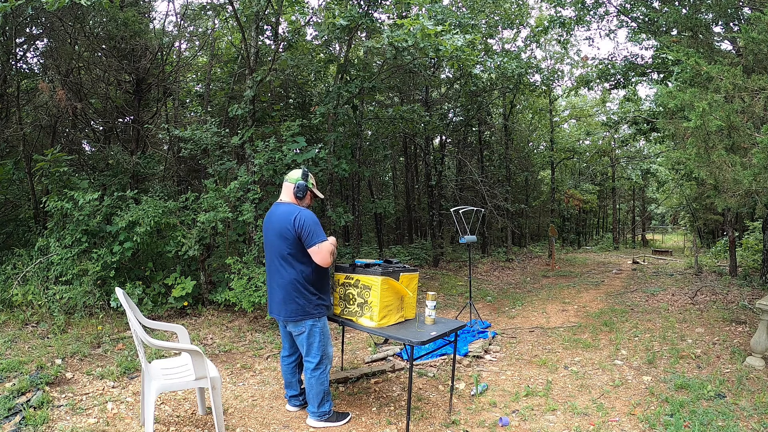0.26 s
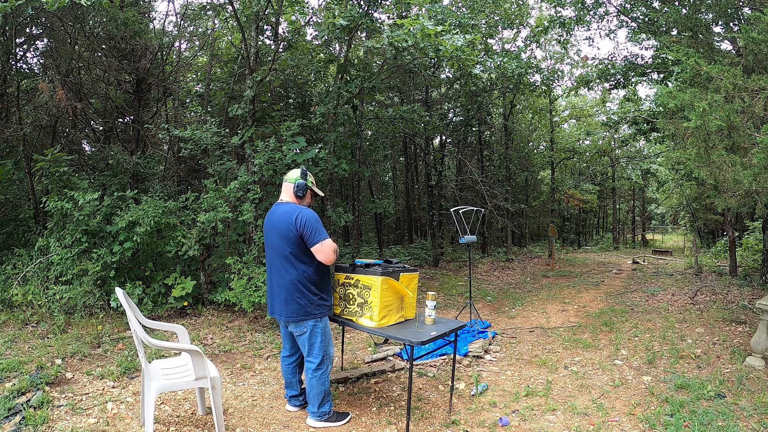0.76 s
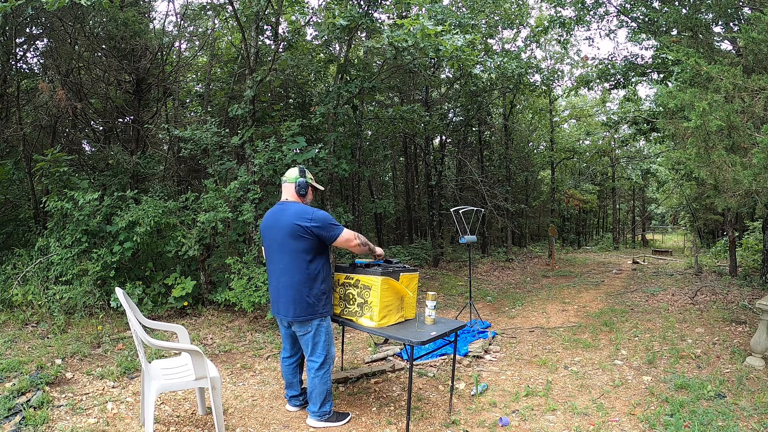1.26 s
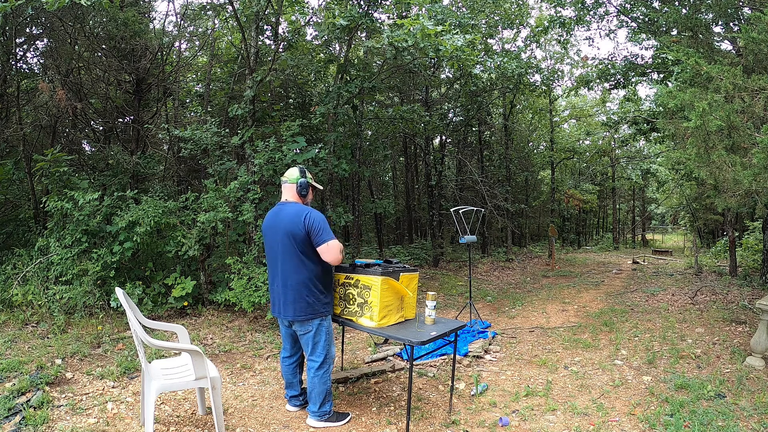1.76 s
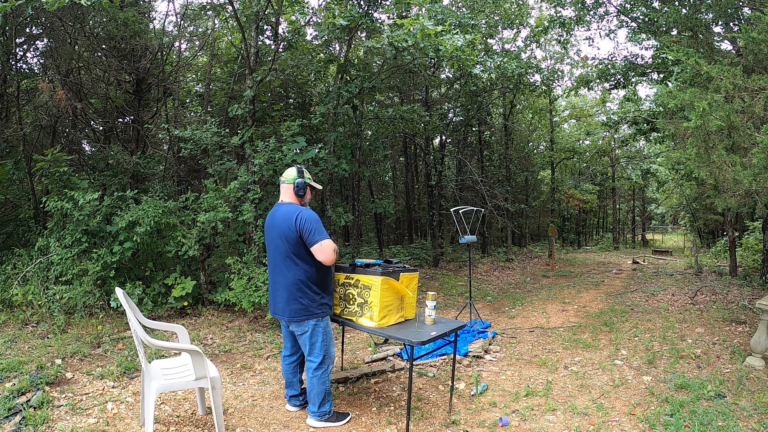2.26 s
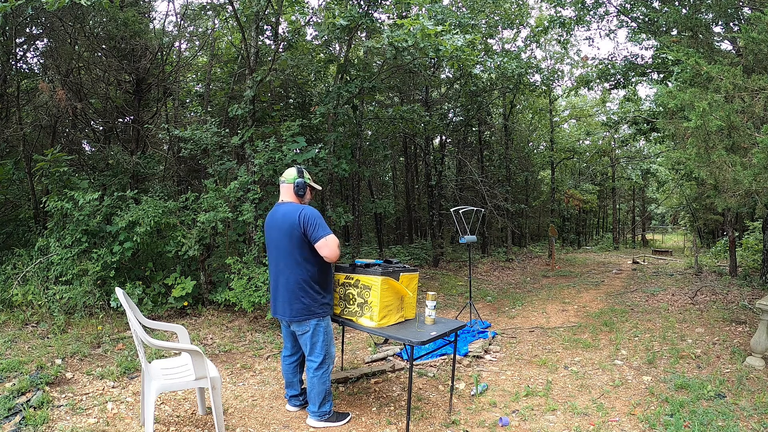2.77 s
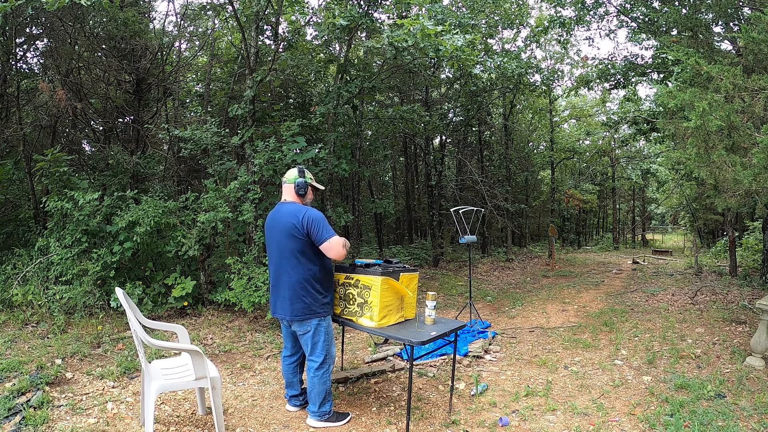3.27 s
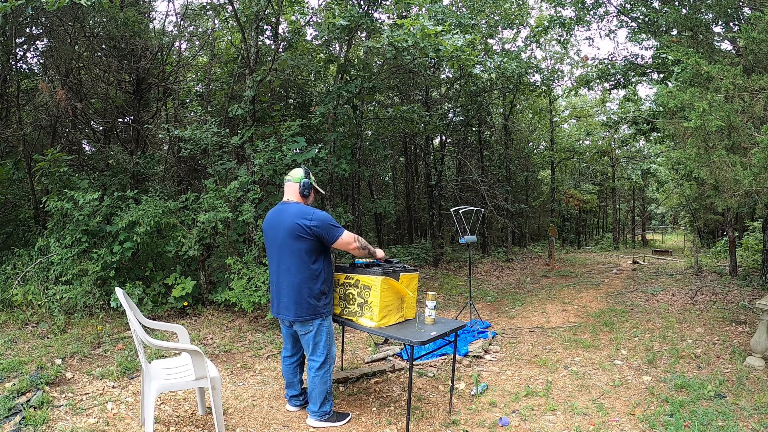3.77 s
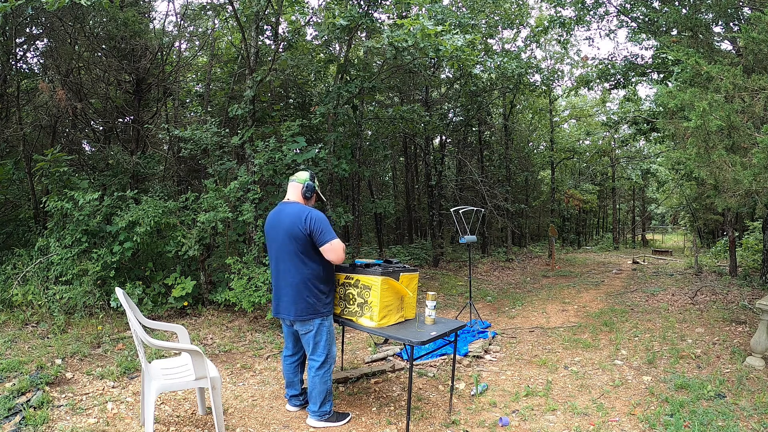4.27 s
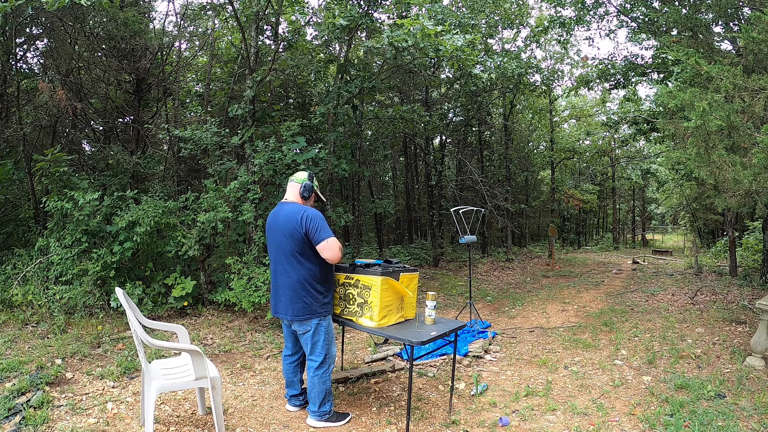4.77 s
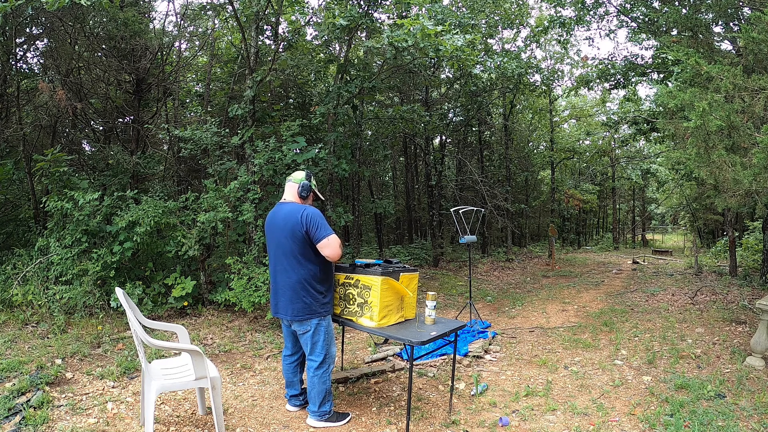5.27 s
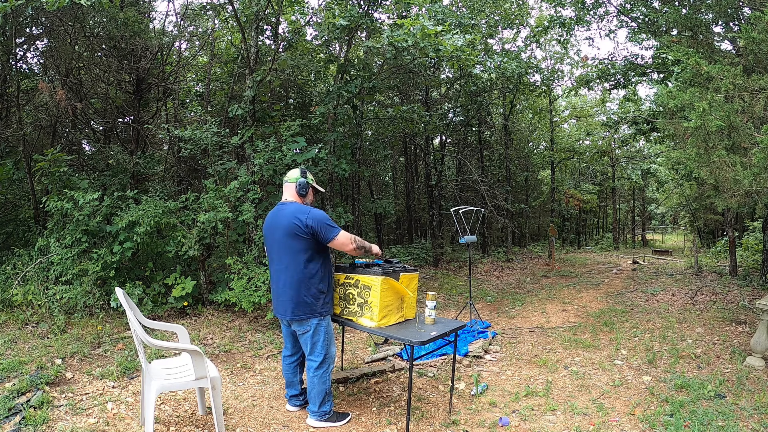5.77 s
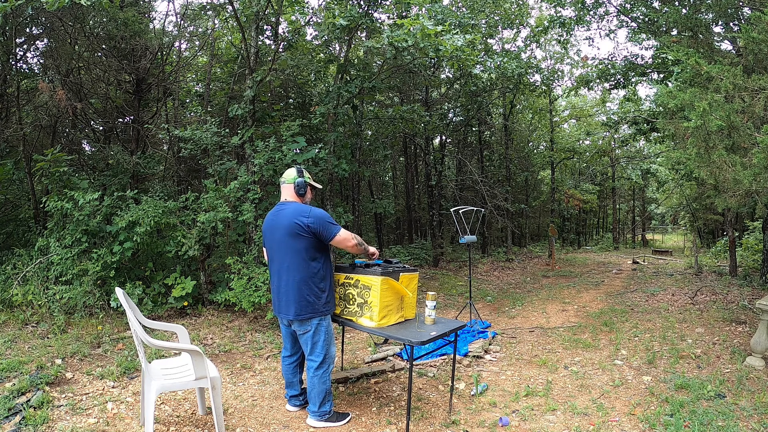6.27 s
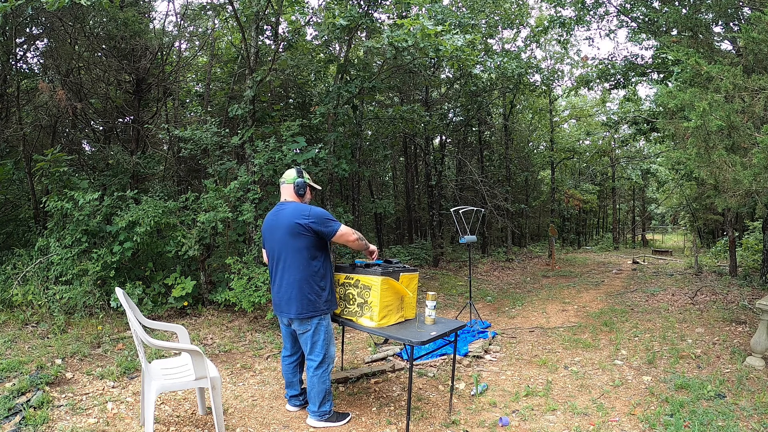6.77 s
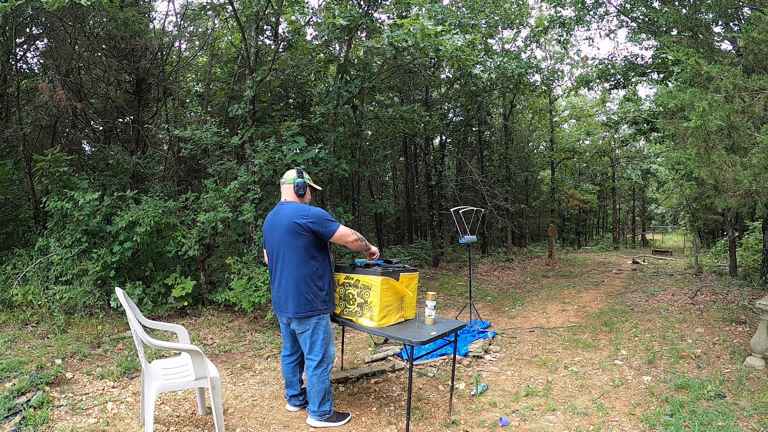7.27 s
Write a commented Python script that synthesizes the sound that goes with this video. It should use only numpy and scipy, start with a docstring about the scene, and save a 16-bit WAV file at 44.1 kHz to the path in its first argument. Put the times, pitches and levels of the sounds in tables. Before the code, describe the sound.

Sharp metallic clacks of a pistol magazine being loaded, then plastic clicks, over soft outdoor hiss and distant birds.

```python
"""Edge of a wood: a few metres off, cartridges are thumbed into a pistol magazine, then picked from a
plastic case. Each contact rings the parts briefly; the ground and the tree trunks throw it back.
Spring and shell sing on after hard snaps; a hand bumps the case and slides brass along plastic and steel.
Wind sways the microphone, mostly below hearing, over a low hum and a wide hiss.
Far off, a dove coos and a small bird chips."""
import sys
import numpy as np
from scipy import signal
from scipy.fft import rfft, irfft
from scipy.io import wavfile
from scipy.ndimage import uniform_filter1d

SR = 44100
rng = np.random.default_rng(int(sys.argv[2]) if len(sys.argv) > 2 else 0)


def transcribe(u):
    """Save the signal u as a 16-bit wav file named by the first command-line argument.

    u: samples, shape (n,) or (channels, n), limited to [-1, 1]; the rate is SR.
    q: integer samples, one column per channel.
    """
    v = np.clip(np.atleast_2d(u).T, -1, 1)
    q = np.round(v * 32767).astype(np.int16)
    wavfile.write(sys.argv[1], SR, q)


N = 331191


def amp(db):
    """dB to gain."""
    return 10 ** (np.asarray(db) / 20)


def unit_rms(x):
    """Scale to rms 1."""
    return x / np.sqrt(np.mean(x ** 2) + 1e-20)


def unit_energy(x):
    """Scale to energy 1."""
    return x / (np.linalg.norm(x) + 1e-12)


def add(mix, at_s, sound):
    """Add a sound to the mix in place."""
    part = mix[max(round(at_s * SR), 0):][:len(sound)]
    part += sound[:len(part)]


def clock(length_s):
    """Sample times [s]."""
    return np.arange(int(length_s * SR)) / SR


def band(x, edges_hz, order=3):
    """Causal band-pass."""
    return signal.sosfilt(signal.butter(order, edges_hz, "band", fs=SR, output="sos"), x)


def shaped_noise(spectrum):
    """Noise shaped by (frequency [Hz], level [dB]) points, joined on a log axis."""
    point_hz, point_db = np.transpose(spectrum)
    db = np.interp(np.log(np.fft.rfftfreq(N, 1 / SR) + 1e-3), np.log(point_hz), point_db)
    return unit_rms(irfft(rfft(rng.standard_normal(N)) * amp(db), N))


def resonant_noise(size, hz, width_hz):
    """Noise in one resonance."""
    detune = 2 * (np.fft.rfftfreq(size, 1 / SR) - hz) / width_hz
    return unit_rms(irfft(rfft(rng.standard_normal(size)) / (1 + detune ** 2), size))


def gain_curve(points):
    """Gain per sample from (time [s], level [dB]) points."""
    return amp(np.interp(np.arange(N) / SR, *np.transpose(points)))


def wind():
    """Slow pressure swings at the microphone."""
    # sway spectrum: (frequency [Hz], relative density [dB])
    spectrum = [(.5, 1), (2, -3.5), (4.5, -1), (7, -9.5), (11, -17), (15, -33.5), (22, -32.5), (30, -53),
                (60, -58), (200, -120)]
    # gust strength: (time [s], level [dB])
    gusts = [(0.0, -17.5), (.45, -16), (.95, -18.5), (1.45, -11.5), (1.8, -28), (2.9, -17), (3.25, -21.5),
             (4.0, -13.5), (4.55, -29.5), (5.7, -24), (6.3, -32), (7.5, -18.5)]
    sway = shaped_noise(spectrum)
    sway /= np.sqrt(uniform_filter1d(sway ** 2, size=SR) + 1e-6)  # the gusts alone set the level
    return gain_curve(gusts) * sway * signal.windows.tukey(N, .025)


def background(hiss_db=-47.5, hum_hz=126):
    """Steady wide hiss and a distant wavering hum."""
    # hiss spectrum: (frequency [Hz], relative density [dB])
    spectrum = [(20, -6), (40, -2), (60, 0.5), (90, 0), (122, 0.5), (165, -7), (260, -9.5), (380, -11.5),
                (600, -13.5), (1200, -17), (3600, -20.5), (7000, -23), (8200, -24.5), (15800, -28)]
    # hum strength: (time [s], level [dB])
    hum_levels = [(0, -58.5), (2.5, -60), (5.1, -64), (5.8, -60.5), (6.6, -62.5), (7.2, -52.5)]
    hiss = amp(hiss_db) * shaped_noise(spectrum)
    return hiss + gain_curve(hum_levels) * resonant_noise(N, hum_hz, width_hz=7.1)


def dove(blur=0.29, fade_db=-10):
    """Soft gliding notes swell and fade, smeared by the wood."""
    # coos: (time [s], length [s], level [dB], start pitch [Hz], end pitch [Hz])
    coos = [(.07, 0.18, -52, 488, 585), (.2, .14, -54, 643, 630), (.82, 0.692, -54, 514, 477),
            (2.1, 0.57, -55.5, 505, 484)]
    out = np.zeros(N)
    for at_s, length_s, db, start_hz, end_hz in coos:
        u = clock(length_s) / length_s
        cycles = np.cumsum(start_hz + (end_hz - start_hz) * u) / SR
        echoes = blur * resonant_noise(len(u), end_hz, width_hz=25)
        envelope = amp(db + fade_db * u ** 1.1) * signal.windows.tukey(len(u), .25)
        add(out, at_s, envelope * (np.sin(2 * np.pi * cycles) + echoes))
    return out


def contact(modes, parts_hz, parts_db, chatter_ms, edge_hz, echo_db,
            crack_s, dense_db, chatter, rise, bounce, bounce_s):
    """A blow and its tiny slips ring hollow, wall, steel and brass; returns (direct, sent to trees)."""
    # dense damped modes re clear ones: (hollow, wall, steel, brass) [dB]
    cracks_db = [-11.5, -7, 2, 0.5]
    # echo lift, as the body shades the direct treble most: (hollow, wall, steel, brass) [dB]
    lifts_db = [-0.3, -1.8, 4.5, 5]
    t = clock(.05)
    impulse = 1. * (t == 0)
    chatter_s = chatter_ms / 1000
    build_up = 1 - np.exp(-t / (rise * chatter_s))  # a long slip builds before it lets go
    slips = rng.standard_normal(len(t)) * build_up * np.exp(-t / chatter_s)
    force = impulse + chatter * unit_energy(slips)
    burst = build_up * np.exp(-t / (crack_s + chatter_s / 2))
    for push in force, burst:
        add(push, bounce_s * rng.uniform(.9, 1.2), bounce * push)  # off the table and the ground
    hardness = signal.butter(6, min(edge_hz, .45 * SR), fs=SR, output="sos")  # softer: less top
    direct, echo_power = np.zeros(len(t)), 0
    for (low_hz, high_hz), db, crack_db, lift_db in zip(parts_hz, parts_db, cracks_db, lifts_db):
        ring = np.zeros(len(t))
        for hz, mode_db, t60_s in modes:
            cycles = hz * rng.normal(1, .003) * t
            if low_hz <= hz < high_hz:
                tone = amp(-60 * t / t60_s) * np.sin(2 * np.pi * cycles)
                ring += amp(mode_db) * unit_energy(signal.fftconvolve(force, tone)[:len(t)])
        crack = band(rng.standard_normal(len(t)) * burst, (low_hz, high_hz), order=4)
        part = unit_energy(ring) + amp(crack_db + dense_db) * unit_energy(crack)
        part = band(signal.sosfilt(hardness, part), (.8 * low_hz, min(1.2 * high_hz, .48 * SR)))
        direct += amp(db) * unit_energy(part)
        # summed over all directions, the mode peaks mostly even out
        flat = unit_energy(signal.sosfilt(hardness, band(impulse, (low_hz, high_hz))))
        echo_power += abs(rfft(amp(db + echo_db + lift_db) * flat)) ** 2
    diffuse = np.roll(irfft(np.sqrt(echo_power), len(t)), 64)
    sent = 0.81 * diffuse + 0.55 * amp(echo_db) * direct
    return np.array([direct, sent]) * np.sqrt(SR / 100)


def magazine():
    """Cartridge clacks: the spot struck tunes wall and steel, hardness sets the top edge."""
    # clacks: (time [s], level [dB], chatter [ms], wall [Hz], second wall [Hz], ring t60 [s],
    # ping re crack [dB], hollow re wall [dB], steel re wall [dB], steel [Hz], brass re wall [dB],
    # top edge [Hz])
    clacks = [(0.1172, -43.5, .78, 2200, 1640, 0.025, 6, -7, -20, 4200, -30, 8400),
              (.396, -49, 0.69, 2240, 1330, .02, 4, 9.5, -5, 4170, -7, 11000),
              (.498, -51.5, 3.6, 1970, 2300, .02, 1, -9, -3, 4860, -2, 15000),
              (.679, -46, 1.3, 2400, 2240, .014, -9, -5, -10, 5100, -1, 14000),
              (.6821, -33, 1.1, 1965, 2430, 0.021, 5, 0, -5.5, 4190, -5, 14000),
              (.7265, -35, 1.1, 2300, 1945, .014, 3, -13, -7, 4250, -12.5, 7500),
              (.811, -38, 3, 1920, 2290, .022, -5, -5.5, -8, 4250, -8, 9800),
              (.8178, -38, 2.6, 2300, 1930, 0.024, -1, -1, -9, 5020, -8.5, 14000),
              (.829, -37.5, 1.4, 2280, 2360, .03, 8, -17, -4.5, 4190, -6, 7500),
              (2.0108, -36.5, 0.14, 2290, 2480, 0.027, 1, -9.5, -19, 4200, -13, 7800),
              (2.273, -52.5, 1.6, 2400, 1890, .02, -4, -5, -11, 4200, -15, 8500),
              (2.8593, -35, 1, 2600, 2820, 0.019, -2, -12, -18, 4150, -15, 8000),
              (2.879, -37.5, 0.83, 2570, 2590, 0.024, 9, -5.5, 0.5, 4130, -14, 11000),
              (2.885, -44, 1.2, 2560, 1840, .026, 4, -2, 2, 4650, -14, 9000),
              (2.974, -50, 2, 1870, 2300, .025, 2, -3, 2, 4200, -6, 12000),
              (2.9832, -39, 0.89, 1390, 2560, 0.025, 5, 1.5, -2.5, 4190, -4.5, 15000),
              (2.9912, -44.5, 1.1, 1700, 2610, .02, 5, -1, -5, 4200, -12, 9500),
              (3.005, -32, 0.91, 2560, 2960, 0.013, -1, -17, -12, 3550, -11.5, 8650),
              (3.0088, -32.5, 0.53, 1390, 2300, 0.02, 0, -27, -10, 4890, -19, 8450),
              (3.012, -40.5, 0.23, 2740, 1860, 0.015, 3, -24, -0.5, 5050, -1, 8850),
              (4.4347, -47, 0.56, 2530, 2940, .01, -3, -4.5, -8, 4200, -8, 9500),
              (4.726, -52.5, 2, 1740, 2300, .02, 0, -1, -17, 4200, -24, 8500),
              (5.2733, -36.5, 0.75, 1850, 2050, 0.017, -3, -24, 1.5, 5040, -1, 12700),
              (5.2768, -34.5, 2.2, 2520, 2390, .014, 5, -17, -8, 3970, -15, 9500),
              (5.3, -47.5, 0.6, 1490, 2300, .018, 0, -2, -6, 3800, -12, 9500),
              (5.358, -35.5, 0.83, 2440, 2160, .014, -1, -14, -4.5, 4400, -13, 9500),
              (5.452, -47, 1.2, 1840, 2500, .02, 2, -10, -0.5, 3650, -6, 10500),
              (5.467, -50, 1.3, 2340, 1500, .02, 0, -6, -9, 3750, -4, 9000)]
    # magazine modes: (frequency [Hz], relative level [dB], t60 [s])
    modes = [(1466, -2.5, 0.027), (1675, -9, 0.023), (1920, 3, .024), (2290, -1, 0.018), (2560, -6, .03),
             (3150, -16, .012), (3630, -2, .012), (4200, -7, 0.055), (5050, -5, .014), (6300, -1, 0.0055),
             (7300, 6.5, 0.0008), (8000, -6, .0049), (8760, 8, .0035), (12400, 7.5, 0.0018)]
    # hollow, wall, steel and brass bands: (low [Hz], high [Hz])
    parts_hz = [(610, 1030), (1280, 3200), (3450, 5350), (6100, 15900)]
    # the hand tunes the hollow and shades the direct sound: (time [s], hollow [Hz], echo [dB])
    grip = [(.4, 910, -14), (.69, 865, -10), (.82, 760, -11.5), (2.88, 710, -7.5), (3.01, 806, -5),
            (5.27, 826, -6.5), (5.4, 830, -7)]
    grip_s, grip_hz, grip_db = np.transpose(grip)
    out = np.zeros((2, N))
    for (at_s, db, chatter_ms, wall_hz, second_hz, t60_s,
         ping_db, hollow_db, steel_db, steel_hz, brass_db, edge_hz) in clacks:
        tuned = [(second_hz, 3 + ping_db, t60_s), (steel_hz, 8 + ping_db, 1.6 * t60_s),
                 (np.interp(at_s, grip_s, grip_hz), 0, 0.035), (wall_hz, 10.5 + ping_db, t60_s)]
        parts_db = db + np.array([hollow_db, 0, steel_db, brass_db])
        direct, sent = contact(list(modes) + tuned, parts_hz, parts_db, chatter_ms, edge_hz,
                               echo_db=np.interp(at_s, grip_s, grip_db), crack_s=0.00084,
                               dense_db=-2 - ping_db, chatter=1.22, rise=0.73,
                               bounce=0.58, bounce_s=.0029)
        add(out[0], at_s, direct)
        add(out[1], at_s, sent)
    return out


def trees(sent, low_t60_s=0.39, treble_t60_s=0.46, delay_s=0.0039, treble_gain=0.97):
    """Trunks and leaves scatter a dense tail."""
    t = clock(.6)
    taps = rng.choice([-1., 1.], len(t)) * np.clip((t - delay_s) / 0.0015, 0, 1)
    low = signal.sosfiltfilt(signal.butter(2, 7000, fs=SR, output="sos"), taps)
    tail = low * amp(-60 * t / low_t60_s) + treble_gain * (taps - low) * amp(-60 * t / treble_t60_s)
    return signal.fftconvolve(sent, unit_energy(tail))[:N]


def spring(rise_s=0.0017):
    """Close modes of spring and shell die away after hard snaps."""
    # mode clusters: (time [s], level-independent centre [Hz], level [dB], width [Hz], t60 [s])
    rings = [(.6821, 920, -50, 50, .14), (.829, 2300, -57, 170, 0.15), (2.0111, 2340, -56, 216, 0.54),
             (2.8593, 2720, -47, 260, 0.24), (2.879, 4230, -50, 230, .4), (2.879, 9400, -48.5, 900, .15),
             (3.0087, 724, -40.5, 64.5, 0.23), (5.2735, 3670, -44, 160, 0.2),
             (5.2735, 8700, -38.5, 1100, 0.26), (5.46, 3650, -56, 160, 0.36)]
    out, t = np.zeros(N), clock(0.19)
    for at_s, hz, db, width_hz, t60_s in rings:
        envelope = amp(db - 60 * t / t60_s) * (1 - np.exp(-t / rise_s))
        add(out, at_s, envelope * resonant_noise(len(t), hz, width_hz))
    return out


def hand_bumps(box_hz=361, t60_s=0.12, rise_s=0.0025, rustle=0.75):
    """The hand knocks dully on the hollow case."""
    # bumps: (time [s], level [dB])
    bumps = [(1.358, -48), (1.387, -46.5), (1.511, -54), (3.026, -47), (3.738, -38.5), (5.921, -42.5),
             (5.949, -51)]
    out, t = np.zeros(N), clock(0.14)
    for at_s, db in bumps:
        knock = np.sin(2 * np.pi * box_hz * t) + rustle * resonant_noise(len(t), box_hz, width_hz=220)
        add(out, at_s, amp(db - 60 * t / t60_s) * (1 - np.exp(-t / rise_s)) * knock)
    return out


def brass_slides():
    """Brass drags along the plastic case or the steel magazine."""
    # slides: (time [s], length [s], level [dB], centre [Hz], width [Hz])
    slides = [(1.398, 0.027, -57, 9900, 1500), (1.46, .035, -54.5, 13400, 1700),
              (2.805, 0.064, -58, 3320, 180), (6.69, .05, -58, 9700, 1210), (6.976, 0.09, -49.5, 2010, 350),
              (7.049, 0.15, -59.5, 2060, 400)]
    out = np.zeros(N)
    for at_s, length_s, db, hz, width_hz in slides:
        u = clock(length_s) / length_s
        add(out, at_s, amp(db) * np.sin(np.pi * u ** 0.47) * resonant_noise(len(u), hz, width_hz))
    return out


def small_bird(t60_s=.42, rise_s=.008, width_hz=850):
    """Thin far chips, smeared by the wood."""
    # chips: (time [s], level [dB], pitch [Hz])
    chips = [(1.735, -50.5, 6830), (4.12, -52.5, 7000), (5.465, -51.5, 7240), (6.715, -50, 6950)]
    out, t = np.zeros(N), clock(0.33)
    for at_s, db, hz in chips:
        envelope = amp(db - 60 * t / t60_s) * (1 - np.exp(-t / rise_s))
        add(out, at_s, envelope * resonant_noise(len(t), hz, width_hz))
    return out


def plastic_case(hollow_hz=716, hollow_db=-13.5, bright_db_per_octave=28):
    """Cartridge clicks: the plastic rings much alike each time; brightness lifts brass and top edge."""
    # picks: (time [s], level [dB], chatter [ms], wall [Hz], steel band re wall [dB], brightness [dB])
    picks = [(5.924, -50, 1.4, 2580, -17, -20), (5.9471, -46.5, 0.84, 2730, -24, -22),
             (5.983, -61, .8, 2500, -10, 8), (6.0567, -31, 1.3, 2660, -14.5, -19.5),
             (6.2959, -57, 0.61, 2500, 4, 9), (6.5046, -36.5, 1, 2470, -15, -32),
             (6.813, -52, 1.1, 2550, -15, -16), (6.838, -43.5, 1, 2300, -14, -4),
             (6.8608, -40.5, 0.45, 2800, -16, 0.5), (7.126, -50, 1.6, 2080, -13, -12)]
    # case modes: (frequency [Hz], relative level [dB], t60 [s])
    modes = [(1390, -25, .0087), (1920, -6, 0.029), (2300, -14, 0.0065), (2870, 2.5, 0.013),
             (3400, -9, 0.012), (4250, 4, 0.007), (8400, -2, 0.0047), (9500, 8, 0.0036), (12700, 7, 0.0024),
             (13700, 1, .004)]
    # hollow, wall, steel and brass bands: (low [Hz], high [Hz])
    parts_hz = [(560, 1300), (1850, 3300), (3400, 4800), (7600, 15900)]
    out = np.zeros((2, N))
    for at_s, db, chatter_ms, wall_hz, steel_db, bright_db in picks:
        tuned = [(hollow_hz, 0, 0.014), (wall_hz, 5, 0.009)]
        parts_db = db + np.array([hollow_db, 0, steel_db, bright_db])
        edge_hz = 14000 * 2 ** (bright_db / bright_db_per_octave)
        direct, sent = contact(list(modes) + tuned, parts_hz, parts_db, chatter_ms, edge_hz,
                               echo_db=-14.5, crack_s=0.00046, dense_db=-4.5, chatter=1.0, rise=0.27,
                               bounce=0.41, bounce_s=0.0023)
        add(out[0], at_s, direct)
        add(out[1], at_s, sent)
    return out


def scene():
    """Mono mix; clacks and clicks also return from the trees."""
    direct, sent = magazine() + plastic_case()
    handling = direct + trees(sent) + spring() + hand_bumps() + brass_slides()
    return (handling + small_bird() + dove() + wind() + background())[None]


def record(dry):
    """Linear-phase low-pass at 15.9 kHz."""
    taps = signal.firwin(511, 15900, window=("kaiser", 9), fs=SR)
    padded = np.pad(dry, ((0, 0), (255, 255)), mode="edge")
    return signal.oaconvolve(padded, taps[None], "valid")


dry = scene()
out = record(dry)
transcribe(out)
```